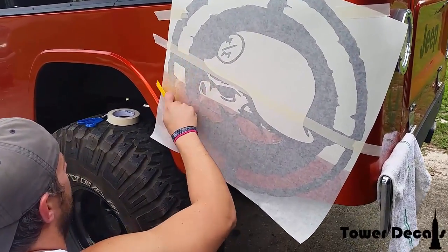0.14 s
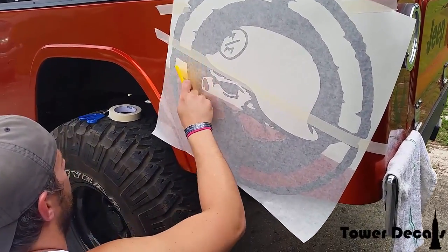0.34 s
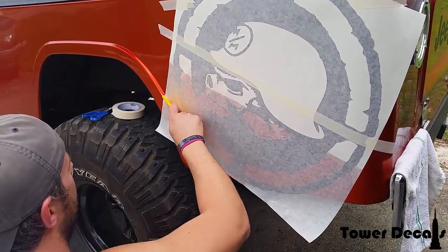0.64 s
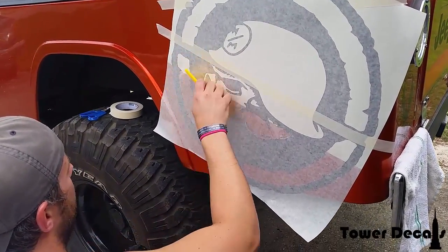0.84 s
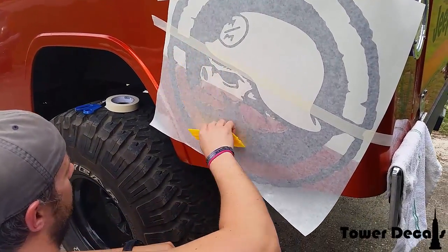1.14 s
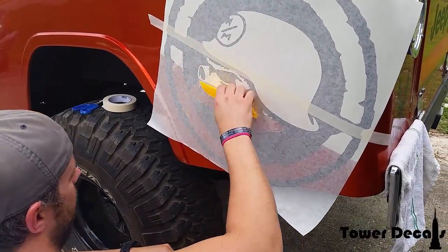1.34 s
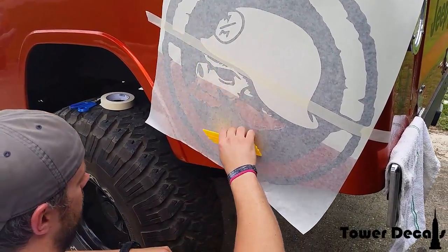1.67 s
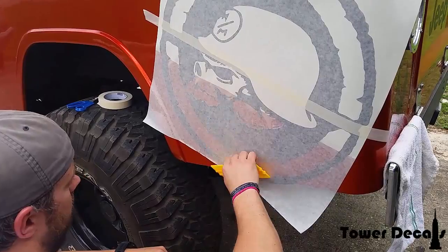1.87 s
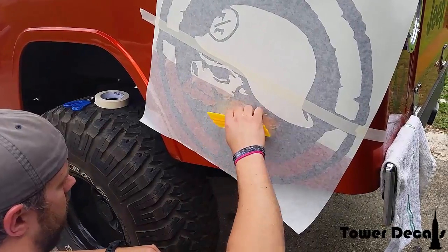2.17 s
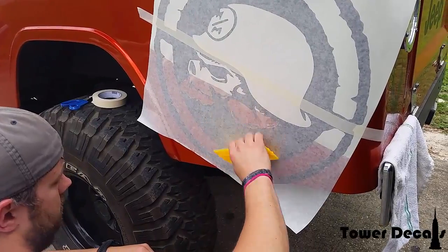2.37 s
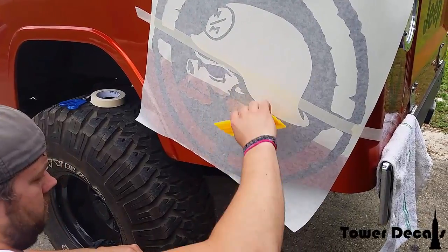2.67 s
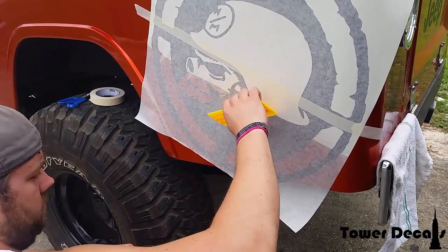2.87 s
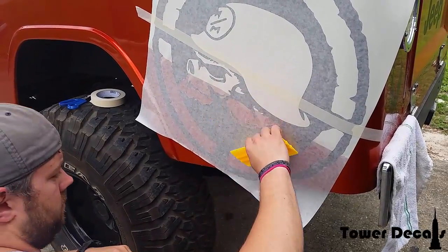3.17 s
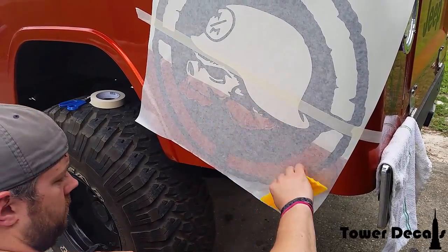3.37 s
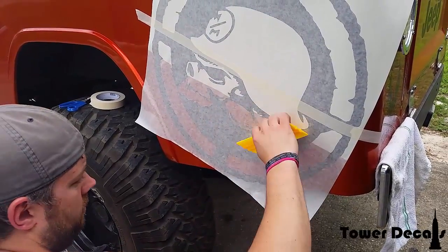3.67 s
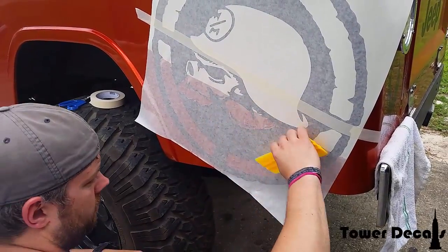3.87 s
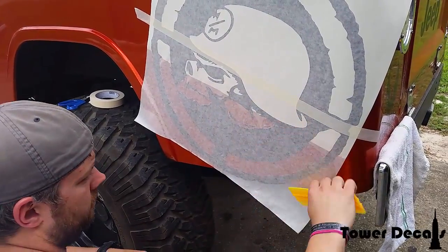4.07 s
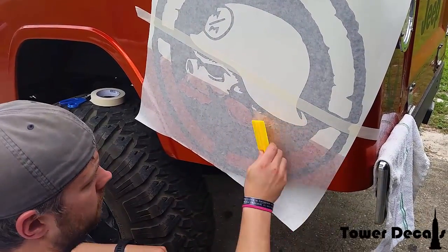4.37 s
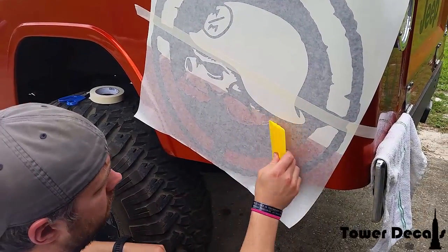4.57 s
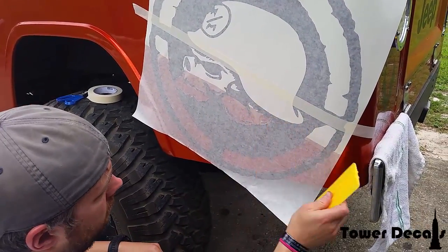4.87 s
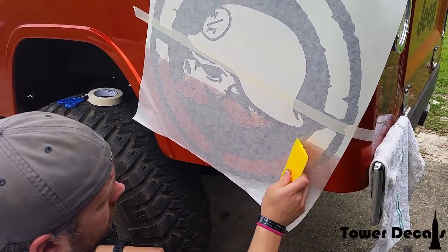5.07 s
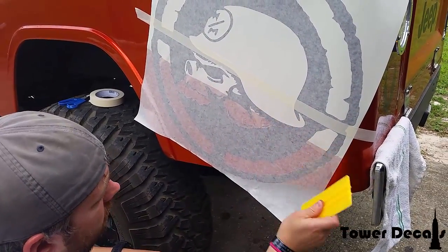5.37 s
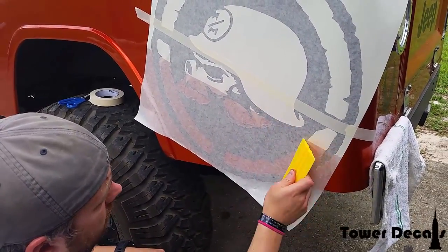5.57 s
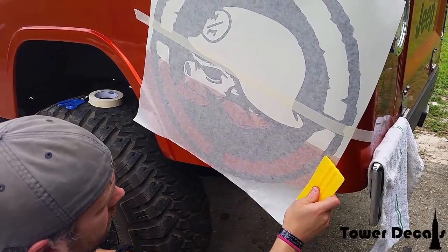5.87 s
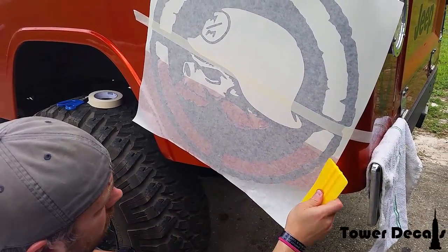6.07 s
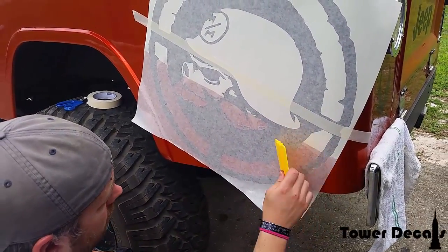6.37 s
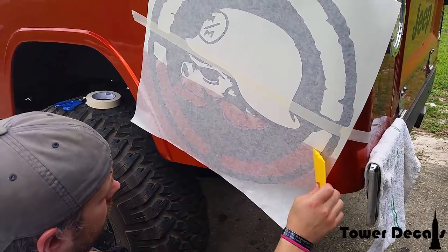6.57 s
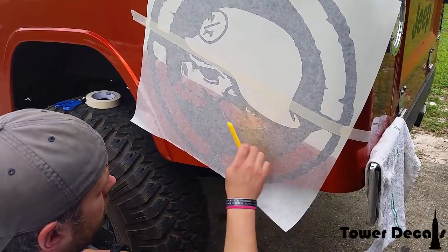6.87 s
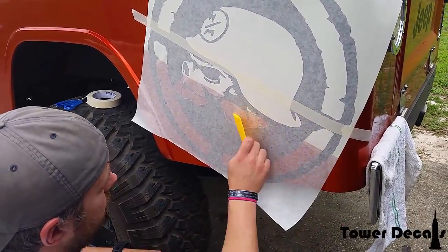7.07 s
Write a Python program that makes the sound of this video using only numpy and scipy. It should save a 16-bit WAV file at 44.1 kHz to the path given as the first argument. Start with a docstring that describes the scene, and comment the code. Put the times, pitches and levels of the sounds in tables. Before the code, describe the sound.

Outdoors, a hard plastic blade rubs a wet decal against a car panel in about a dozen short, raspy strokes, two or so a second. Each starts or ends with a knock or click and a dull panel thud; water fizzes and spurts at the edge. Behind it are soft insects, a low wavering machine drone, light breeze and small birds whistling. Close stereo microphone, the rub's upper mids leaning left, little echo.

```python
"""A plastic squeegee drags over a wet decal on a car's side panel in short uneven strokes: tiny stick-slips
hiss through blade and paper, water fizzes past the edge, the blade's free span scrapes and the panel rumbles.
Each landing or snag strikes decaying modes of panel and blade, with a splash and a tick of noise.
Outdoors, birds whistle gliding notes, insects and a droning machine are shaped noise, and a light breeze
stirs the bass; two microphone ports hear it all with unlike colour."""
import sys
import numpy as np
from scipy import signal
from scipy.fft import rfft, irfft, next_fast_len
from scipy.io import wavfile

SR = 44100
rng = np.random.default_rng(int(sys.argv[2]) if len(sys.argv) > 2 else 0)


def amplitude_ratio(level_db):
    """Convert a level in decibels to the matching linear amplitude (field) ratio."""
    exponent = np.asarray(level_db, float) / 20
    return 10 ** exponent


def transcribe(signal):
    """Save signal, clipped to [-1, 1], as a 16-bit WAV file at the path in sys.argv[1]."""
    frames = np.atleast_2d(signal).T
    limited = np.clip(frames, -1, 1)
    pcm = np.round(limited * 32767).astype(np.int16)
    wavfile.write(sys.argv[1], SR, pcm)


N = 318402

# Blade landings and snags. Each row: start in seconds, relative panel level in dB, pitch of the spot
# struck in Hz, relative crack level in dB, crack pitch in Hz.
KNOCKS = [(0.1083, -43, 172, -25, 4300), (0.1124, -11.5, 170, -22.5, 3900), (0.122, -22, 413, -22, 2600),
          (0.5488, -8, 182, -21, 4100), (0.5574, -8.5, 195, -16.5, 2680), (0.72, -22, 850, -45, 3200),
          (1.0727, -40, 144.5, -31.5, 4340), (1.0794, -22, 202, -34, 2590), (1.2088, -22, 300, -18, 2620),
          (1.2096, -23.5, 940, -30, 2500), (1.5285, -10.5, 243, -19.5, 2170), (2.062, -28, 400, -36, 3210),
          (2.3473, -28, 255, -23, 2450), (2.646, -25.5, 576, -22, 3610), (3.1434, -34, 234, -24.5, 2554),
          (3.1482, -37, 221, -30.5, 2370), (3.5, -27.5, 403, -32, 2660), (3.514, -29, 440, -37, 2750),
          (3.8978, -26, 400, -23, 2920), (4.123, -30, 420, -24, 1500), (4.5914, -24.5, 236, -31, 1770),
          (4.6332, -18.5, 455, -15, 2050), (4.791, -53, 1200, -22, 2380), (5.2719, -21.5, 290, -21, 2200),
          (5.288, -21.5, 430, -18, 2300), (5.7668, -22, 566, -29, 1810), (5.7951, -33, 452, -31, 2110),
          (6.628, -37, 370, -34, 2840), (6.6543, -25.5, 325, -22, 1850), (7.1911, -12.5, 258, -26.5, 1990),
          (7.2031, -17.5, 700, -21, 1870)]
# Modes of the panel. Each row: frequency in Hz, relative level in dB, nominal 60 dB decay time in seconds.
PANEL_MODES = [(149, -9, 0.095), (187, -18, 0.5), (237, -0.5, 0.099), (290, -6, 0.15), (324, -1.5, 0.093),
               (392.4, -10, 0.25), (423.3, 1, 0.11), (484, -0.5, 0.04), (622.6, -8, 0.15),
               (730, 5.5, 0.027), (864, -2, 0.058), (952, 2.5, 0.038), (1200, -3, 0.062)]
# Modes of the blade. Each row: frequency in Hz, relative level in dB, 60 dB decay time in seconds.
BLADE_MODES = [(1520, 0, 0.011), (1950, -1, .008), (2450, 2, 0.005), (3000, -3, .005), (4130, -2.5, 0.006),
               (5270, -2, 0.005)]
# Spectrum of the rubbing hiss. Each row: frequency in Hz, relative density in dB per Hz.
RUB_SPECTRUM = [(820, -29.5), (1400, -4.5), (1620, -16.5), (2080, -1.5), (2300, -5), (2890, -1),
                (3150, -5.5), (3650, -7), (4680, -3.5), (6190, -14), (9000, -28), (11700, -77),
                (19800, -120)]
# Spectrum of water fizzing past the edge. Each row: frequency in Hz, relative density in dB per Hz.
FIZZ_SPECTRUM = [(3530, -0.5), (6000, 5.5), (8500, 2), (10700, 8.5), (13100, 4.5), (14900, 5.5), (15700, 5),
                 (16300, -39), (16700, -82)]
# Spectrum of the outdoor floor. Each row: frequency in Hz, relative density in dB per Hz.
AIR_SPECTRUM = [(12, -15), (20, -19), (119, -12.5), (178, -8.5), (252, -10), (357, -10.5), (718, -18.5),
                (783, -13.5), (855, -17), (1300, -17), (1690, -65.5), (2860, -120)]
# Spectrum of the insects. Each row: frequency in Hz, relative density in dB per Hz.
INSECT_SPECTRUM = [(760, -26.5), (1300, 3.5), (1560, -5), (1750, -4.5), (1860, -4.5), (2300, 1.5),
                   (2450, 0), (2660, -11), (4560, -6), (5520, -18), (8240, -23.5), (9360, -32.5),
                   (10700, -21), (15200, -22), (16200, -34)]
# Wavering drone of a machine. Each row: frequency in Hz, bandwidth in Hz, level in dB.
DRONE_BANDS = [(58.5, 7.6, -52), (117, 20, -51), (239.4, 15.7, -50)]
# One quick bird note. Each row: time after its start in seconds, pitch in Hz, relative level in dB, burr in Hz.
CHIRP_SHAPE = [(0, 2025, 0, -3), (.004, 2150, 8.5, 11), (.02, 2010, 16, 2), (.029, 2350, 12.5, -9),
               (.037, 2750, 8, 90), (.042, 2178, -15, 60), (.047, 1920, 13.5, 0), (.054, 2000, -44, -2)]
# Quick bird notes. Each row: start in seconds, pitch shift in Hz, relative level in dB.
CHIRPS = [(2.305, -20.5, -68), (2.394, -29.5, -61.5), (2.863, 19.5, -64), (2.95, -19, -64),
          (3.037, 0.5, -63.5), (3.565, 19.5, -59), (3.648, -35.5, -59.5), (3.743, -31.5, -65.5)]
# One slurred whistle. Each row: time from its top in seconds, pitch in Hz, relative level in dB, burr in Hz.
SLUR_SHAPE = [(-.17, 1824, -3, 21), (-.1, 2286, -4, 24), (-.05, 2428, -0.5, 200), (0, 2594, 0, 390),
              (.03, 2306, 3.5, 300), (.045, 2120, 4, 31), (.08, 2000, 1.5, 15), (.115, 2028, -12, 15)]
# Slurred whistles. Each row: time of the top in seconds, stretch in time, relative level in dB.
SLURS = [(5.99, 1.1, -54.5), (6.5, 1.14, -55.5), (6.95, 1.2, -54.5)]
# Short plain bird notes. Each row: middle in seconds, length in seconds, pitch in Hz, glide in Hz,
# relative level in dB.
NOTES = [(0.036, 0.088, 2230, -220, -51), (2.263, .035, 5400, -450, -72), (4.235, 0.031, 2026, -250, -45),
         (4.315, 0.033, 2267, -120, -46.5), (4.324, 0.017, 2400, 351.5, -47), (4.314, .025, 6200, -78, -70),
         (5.071, .025, 1750, -2, -54), (5.094, .024, 1950, -31, -52), (5.113, 0.03, 1787, -54.5, -54),
         (5.143, .03, 2010, 44, -47), (5.225, 0.023, 2250, -24, -51)]
# Balance of the two ports. Each row: frequency in Hz, left minus right in dB.
PORT_LEAN = [(60, 2.5), (92, -2), (140, 1.5), (210, 1), (330, 0.5), (500, 2), (770, 4.5), (1170, 4),
             (1790, 7), (2740, 10.5), (3900, 22.5), (5400, 24.5), (7000, 7.5), (10700, -4.5), (13000, -3.5),
             (15000, -1.5)]
# Likeness of the channels for the nearby work. Each row: frequency in Hz, likeness from -1 to 1.
NEAR_LIKENESS = [(60, 0.38), (180, 1), (550, 0.94), (1650, 0.86), (4970, 0), (15000, 0)]
# Likeness of the channels for far sources. Each row: frequency in Hz, likeness from -1 to 1.
FAR_LIKENESS = [(60, 1), (180, 1), (550, 0.84), (1650, -0.25), (4970, -0.1), (15000, 0.1)]
# Course of the rub, one list for each stroke. Each row: time in seconds, relative level in dB.
STROKES = [
    [(0.15, -59), (0.154, -65), (0.2, -44), (0.292, -51.5), (0.328, -50), (0.4, -65)],
    [(0.59, -59), (0.636, -42), (0.766, -39.5), (0.796, -42), (0.818, -58.5), (0.85, -62)],
    [(1.1, -59.5), (1.134, -43.5), (1.246, -36), (1.306, -40), (1.37, -66)],
    [(1.56, -54.5), (1.612, -45.5), (1.668, -42.5), (1.83, -55.5)],
    [(1.84, -60), (1.908, -49), (1.932, -50.5), (1.994, -45), (2.07, -48), (2.13, -75)],
    [(2.4, -84), (2.422, -58), (2.594, -37.5), (2.654, -44), (2.68, -56), (2.72, -74)],
    [(3.157, -50.5), (3.205, -64), (3.215, -62)],
    [(3.235, -70), (3.259, -52.5), (3.485, -52.5), (3.553, -40.5), (3.579, -55), (3.61, -55.5)],
    [(3.92, -69), (3.934, -63), (4.034, -44.5), (4.132, -48.5), (4.2, -45), (4.26, -69)],
    [(4.66, -65.5), (4.748, -47.5), (4.874, -46), (4.946, -48.5), (5.004, -46), (5.08, -65.5)],
    [(5.31, -70), (5.334, -49.5), (5.41, -46), (5.482, -41.5), (5.508, -54.5), (5.54, -62)],
    [(5.81, -60), (5.824, -55.5), (5.876, -47.5), (6.0, -60.5), (6.006, -69), (6.02, -62)],
    [(6.667, -59), (6.673, -50.5), (6.829, -46.5), (6.863, -60), (6.91, -67)],
]
# How each stroke is made. Each row: wet fizz against the rub at the start in dB, the same at the end in dB,
# scrape against the rub in dB, middle pitch of the blade's free span in Hz, relative panel rumble in dB.
GRIPS = [(-18, -9, -1, 1650, -44), (-21, -6, -3.5, 1800, -43.5), (-20, -1.5, -6.5, 1750, -46),
         (-17, -7.5, 0, 1900, -45.5), (-11, -16.5, 1, 1780, -49.5), (-22, -0.5, -2.5, 1400, -47.5),
         (-12, -18, 1.5, 2040, -54), (-9, -9.5, 4, 1950, -46), (-16.5, 1, 3, 1850, -44.5),
         (-11, 4, 4, 1800, -56), (-7, -0.5, 0, 1960, -53.5), (-6.5, -8, 2.5, 2100, -49),
         (-5, 1, 5.5, 2000, -58)]
# Heavy drags that wake a low resonance of the panel. Each row: middle in seconds, length in seconds,
# relative level in dB.
DRAGS = [(0.739, .06, -46), (1.119, 0.026, -45.5), (1.211, 0.084, -38.5), (1.917, .14, -47.5),
         (3.493, 0.11, -51.5), (3.96, 0.071, -50)]
# Water spurts past the edge. Each row: middle in seconds, length in seconds, relative level in dB.
SPURTS = [(1.285, .05, -52), (2.072, 0.065, -55.5), (2.635, 0.06, -47.5), (3.545, 0.056, -54),
          (4.88, 0.12, -48), (5.01, 0.03, -40), (5.478, 0.03, -44), (6.324, 0.029, -50),
          (6.838, 0.033, -43)]
# A high resonance of the edge sings out. Each row: middle in seconds, length in seconds, level in dB.
SINGS = [(1.27, 0.082, -48), (2.59, 0.11, -38.5), (4.06, 0.13, -58), (4.8, 0.16, -45.5),
         (5.0, 0.064, -40.5), (5.88, 0.057, -62)]

TIME = np.arange(N) / SR
SIZE = next_fast_len(N + SR // 4)
GRID = np.maximum(np.arange(SIZE // 2 + 1) * SR / SIZE, 1)  # Hz


def rms_one(x):
    """Normalization: scales a signal to unit mean power."""
    return x / np.sqrt(np.mean(x ** 2) + 1e-20)


def at_hz(points):
    """Interpolates a spectrum table over log frequency on the whole frequency grid."""
    hz, value = np.transpose(points)
    return np.interp(np.log(GRID), np.log(hz), value)


def colour(x, gain_db):
    """Minimum-phase filtering: folding the cepstrum makes a causal filter of the given magnitude."""
    cepstrum = irfft(gain_db * np.log(10) / 20, SIZE)
    cepstrum[1:SIZE // 2] *= 2
    cepstrum[SIZE // 2 + 1:] = 0
    response = np.exp(rfft(cepstrum))
    return irfft(rfft(x, SIZE) * response, SIZE)[..., :N]


def spread(mid, side, likeness):
    """Coherence: the shares of a common and an opposed signal set the channels' likeness by frequency."""
    alike = np.clip(at_hz(likeness), -1, 1)
    common = np.sqrt((1 + alike) / 2) * rfft(mid, SIZE)
    opposed = np.sqrt((1 - alike) / 2) * rfft(side, SIZE) * [[1], [-1]]
    return irfft(common + opposed, SIZE)[:, :N]


def drift(rate):
    """Slow random modulation: straight lines join normal random knots, rate of them a second."""
    knots = int(N / SR * rate) + 2
    return np.interp(TIME * rate, np.arange(knots), rng.standard_normal(knots))


def ring(clicks, hz, t60):
    """Damped resonance: a unit click sets a decaying sine of initial height 1 ringing."""
    radius, angle = amplitude_ratio(-60 / (t60 * SR)), 2 * np.pi * hz / SR
    return signal.lfilter([0, np.sin(angle)], [1, -2 * radius * np.cos(angle), radius * radius], clicks + 1e-18)


def decay(blows, t60):
    """Exponential decay: each blow starts an envelope that falls 60 dB in t60 seconds."""
    return signal.lfilter([1], [1, -amplitude_ratio(-60 / (t60 * SR))], blows + 1e-18)


def swells(rows):
    """Gaussian envelopes: short bell-shaped rises of level."""
    return sum(amplitude_ratio(db) * np.exp(-(2 * (TIME - s) / length) ** 2) for s, length, db in rows)


def echoes(x, t60, level_db):
    """Diffuse reflection: convolution with decaying noise blurs a sound, unlike in the two channels."""
    lag = np.arange(SR // 3) / SR
    tail = rng.standard_normal((2, len(lag))) * amplitude_ratio(level_db - 60 * lag / t60)
    return signal.fftconvolve(x * np.ones((2, 1)), tail, axes=1)[:, :N]


def wind():
    """Flow noise: a light breeze stirs each port on its own, far down in the bass."""
    low = signal.sosfilt(signal.butter(2, [36, 85], "band", fs=SR, output="sos"), rng.standard_normal((2, N)))
    return amplitude_ratio(-57.5 + 0.9 * drift(3.6)) * rms_one(low)


def drone():
    """Resonance of noise: narrow bands waver in level, the faster the wider they are."""
    out = np.zeros((2, N))
    for hz, width_hz, db in DRONE_BANDS:
        noise = spread(*rng.standard_normal((2, N)), FAR_LIKENESS)
        t60 = np.log(1000) / np.pi / width_hz
        out += amplitude_ratio(db) * rms_one(ring(noise, hz, t60))
    return out


def outdoors():
    """Sum of many far sources: traffic, insects and leaves merge into shaped noise, under the drone."""
    white = spread(*rng.standard_normal((2, N)), FAR_LIKENESS)
    out = amplitude_ratio(-53 + 1.6 * drift(3.335)) * rms_one(colour(white, at_hz(AIR_SPECTRUM)))
    out += amplitude_ratio(-56 + 1.4 * drift(4.5)) * rms_one(colour(white, at_hz(INSECT_SPECTRUM)))
    # one kind of insect sings in a thin high band
    out += amplitude_ratio(-81) * rms_one(ring(white, 10750, 0.0066))
    return out + drone()


def whistle(rows, tremble):
    """Frequency modulation: a near sine follows its rows, burry where the pitch trembles."""
    s, hz, db, burr_hz = np.transpose(rows)
    pitch = np.interp(TIME, s, hz) + np.interp(TIME, s, burr_hz) * tremble
    level = amplitude_ratio(np.interp(TIME, s, db, -200, -200))  # as good as silent outside the rows
    return np.sqrt(2) * level * np.sin(2 * np.pi * np.cumsum(pitch) / SR)


def birds():
    """Gliding tones: notes flutter on their way and come with echoes from walls and trees."""
    tremble = np.tanh(drift(350))
    song = np.zeros(N)
    for s, stretch, db in SLURS:
        song += whistle(np.multiply(SLUR_SHAPE, [stretch, 1, 1, 1]) + [s, 0, db, 0], tremble)
    for s, hz, db in CHIRPS:
        song += whistle(np.add(CHIRP_SHAPE, [s, hz, db, 0]), tremble)
    arch = np.array([-.5, -.2, .2, .5])
    for s, length, hz, glide_hz, db in NOTES:
        level_db = db - 12 * (np.abs(arch) > .3)  # the ends lie under the middle
        rows = [s + length * arch, hz + glide_hz * arch, level_db, 0 * arch]
        song += whistle(np.transpose(rows), tremble)
    song *= amplitude_ratio(2.6 * drift(140))
    return song + echoes(song, .3, level_db=-33)


def strike(modes, s, peak_db, pitch_hz, focus_db, landing_s):
    """Modal excitation: modes near the given pitch ring most; an edge landing along its length starts them unevenly."""
    out, luck = np.zeros(N), rng.random((len(s), len(modes), 2))
    for k, (hz, db, t60) in enumerate(modes):
        clicks = np.zeros(N + SR)
        at = np.round((s + landing_s * luck[:, k, 0] ** 2) * SR).astype(int)
        off_pitch_db = focus_db * np.abs(np.log2(hz / pitch_hz))  # focus_db is dB per octave
        clicks[at] = amplitude_ratio(peak_db + db - off_pitch_db + 8 * (luck[:, k, 1] - .5))
        out += ring(clicks[:N], hz, t60)
    return out


def knocks():
    """Impact: the panel thuds, the blade cracks, the wet sheet splashes and the edge ticks."""
    s, panel_db, spot_hz, crack_db, crack_hz = np.transpose(KNOCKS)
    thud = strike(PANEL_MODES, s, panel_db - 7.5, spot_hz, focus_db=10.0, landing_s=0.00386)
    # a small panel radiates little below its lowest mode
    thud = signal.sosfilt(signal.butter(4, 125, "high", fs=SR, output="sos"), thud)
    crack = strike(BLADE_MODES, s, crack_db - 4.5, crack_hz, focus_db=8.5, landing_s=.002)
    blows = np.zeros(N)
    blows[np.round(s * SR).astype(int)] = amplitude_ratio(crack_db)
    noise = spread(*rng.standard_normal((2, N)), NEAR_LIKENESS)
    splash = amplitude_ratio(-9.5) * decay(blows, 0.054) * noise
    tick = amplitude_ratio(-29.5) * decay(blows, 0.014) * noise
    return -thud - crack + colour(splash, at_hz(RUB_SPECTRUM)) + colour(tick, at_hz(FIZZ_SPECTRUM))


def slips(uneven_db, judder_db):
    """Stick-slip friction: dense tiny slips of uneven size along the blade's edge, their strength juddering."""
    unevenness = amplitude_ratio(uneven_db * np.minimum(rng.exponential(1, (2, N)), 5))
    sizes = unevenness * rng.standard_normal((2, N))
    return spread(*sizes, NEAR_LIKENESS) * amplitude_ratio(judder_db * (drift(35) + drift(220)))


def stroke_courses():
    """Friction under a moving grip: gains of rub, fizz, rumble and scrape, and the span's pitch in Hz."""
    lead_db, lead_s = 9, 0.032  # the scrape speaks first, while the blade is still slow
    thinning, bright_ref_db = 0.28, -17.5  # dB of scrape lost per dB of brightness above the reference
    rumble_follows, rumble_lead_db = 0.74, 12  # share of the rub's swing; extra as the blade takes hold
    touch_s, span_rise_hz = 0.01203, 499.2  # fade beyond each end; climb of the span's pitch in a stroke
    gains, centre_hz = np.zeros((4, N)), np.full(N, 1800.)
    for rows, (first_db, last_db, scrape_db, hz, rumble_db) in zip(STROKES, GRIPS):
        s, level_db = np.transpose(rows)
        touch = np.clip(np.minimum(TIME - s[0], s[-1] - TIME) / touch_s + 1, 0, 1)
        rub_db = np.interp(TIME, s, level_db)
        # the share of fizz moves steadily; most strokes brighten as the blade gathers speed
        bright_db = np.interp(TIME, s[[0, -1]], [first_db, last_db])
        early = np.exp(-np.maximum(TIME - s[0], 0) / lead_s)
        scrape_db = rub_db + scrape_db + lead_db * early - thinning * (bright_db - bright_ref_db)
        rumble_db = rumble_db + rumble_follows * (rub_db - level_db.max()) + rumble_lead_db * early
        gains += touch * amplitude_ratio(np.array([rub_db, rub_db + bright_db, rumble_db, scrape_db]))
        rise = np.interp(TIME, s[[0, -1]], [-.5, .5])
        centre_hz = np.where(touch > 0, hz + span_rise_hz * rise, centre_hz)
    return gains, centre_hz


def free_span(edge, wet, centre_hz):
    """Broad resonance: low-passed slips carried up to a pitch that wavers with the grip."""
    phase = 2 * np.pi * np.cumsum(centre_hz + 220 * drift(18)) / SR
    along, across = signal.sosfilt(signal.butter(2, 520, fs=SR, output="sos"), [edge, wet])
    return rms_one(along * np.cos(phase) + across * np.sin(phase))


def strokes():
    """Friction drives resonators: slips hiss through blade and paper, water fizzes, the panel rumbles along."""
    (rub, fizz, rumble, scrape), centre_hz = stroke_courses()
    edge, wet = slips(uneven_db=2.5, judder_db=1.03), slips(uneven_db=-3.5, judder_db=1.0)
    # the panel decays slightly faster under the rubbing blade
    shaken = sum(amplitude_ratio(db) * ring(edge, hz, t60 * 0.98) for hz, db, t60 in PANEL_MODES)
    span = free_span(edge, wet, centre_hz)
    low_panel = rms_one(ring(edge, 928, 0.018))
    out = amplitude_ratio(5) * rub * rms_one(colour(edge, at_hz(RUB_SPECTRUM)))
    out += amplitude_ratio(5.5) * (fizz + swells(SPURTS)) * rms_one(colour(wet, at_hz(FIZZ_SPECTRUM)))
    out += amplitude_ratio(2.0) * (scrape * span + swells(DRAGS) * low_panel)
    out += swells(SINGS) * rms_one(ring(edge, 4910, 0.0086))
    return out + rumble * rms_one(shaken)


def scene():
    """Superposition of all sources; the work echoes faintly off ground and walls."""
    work = strokes() + knocks()
    return work + echoes(work.mean(axis=0), 0.66, level_db=-49) + birds() + outdoors() + wind()


def roll_off(x):
    """The treble ends steeply here."""
    return signal.sosfilt(signal.butter(12, 16100, fs=SR, output="sos"), x)


def record(dry):
    """Port response: left is strong in the upper middle, right in the high treble, their power sum flat."""
    lean = at_hz(PORT_LEAN)
    left_db = -10 * np.log10((1 + amplitude_ratio(-2 * lean)) / 2)
    ports = np.array([colour(dry[0], left_db), colour(dry[1], left_db - lean)])
    return roll_off(ports)


dry = scene()
out = record(dry)
transcribe(out)
```